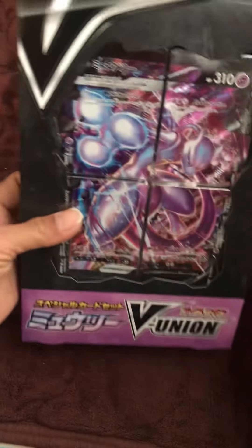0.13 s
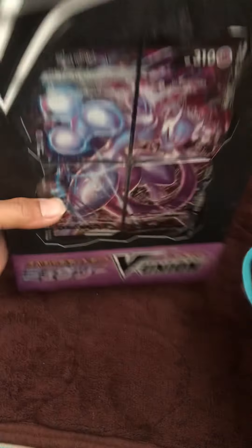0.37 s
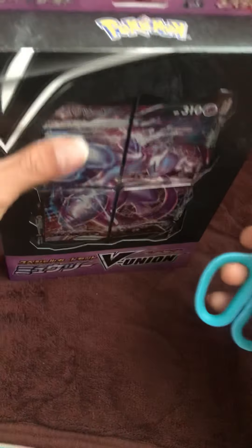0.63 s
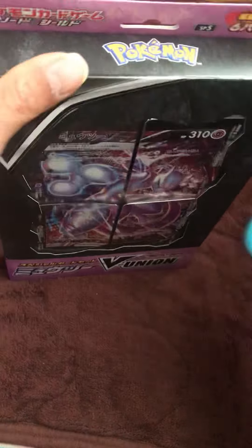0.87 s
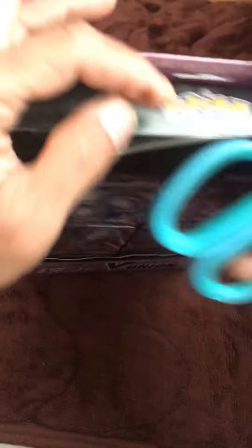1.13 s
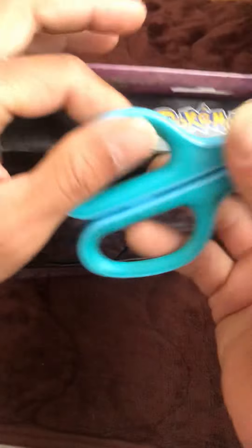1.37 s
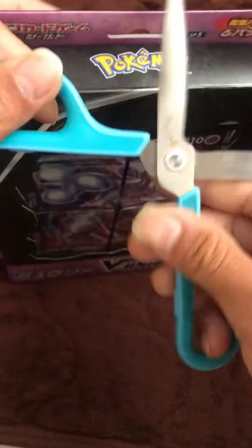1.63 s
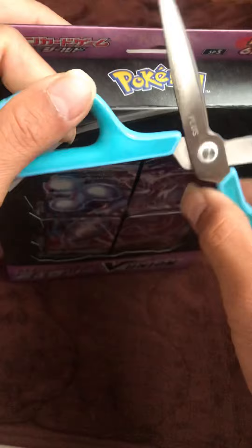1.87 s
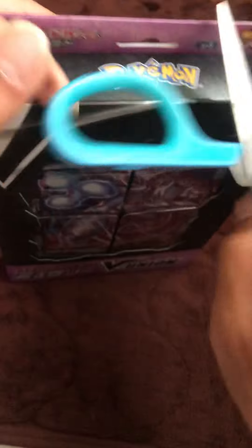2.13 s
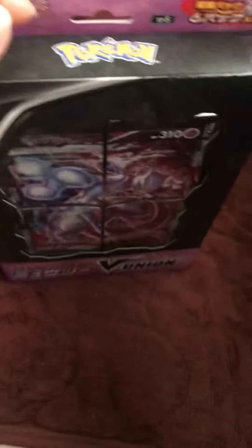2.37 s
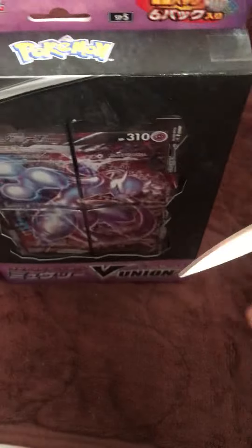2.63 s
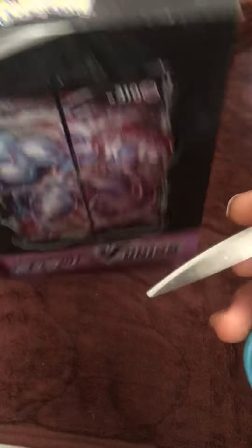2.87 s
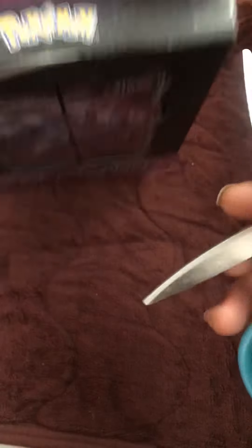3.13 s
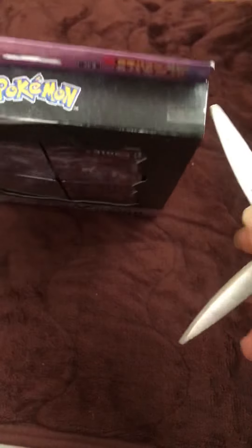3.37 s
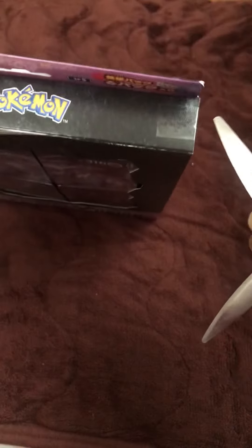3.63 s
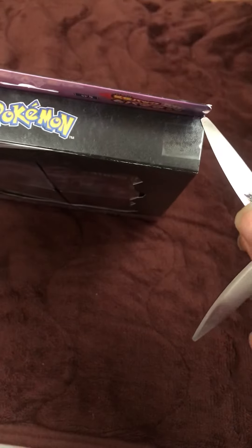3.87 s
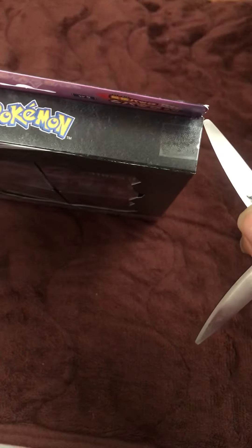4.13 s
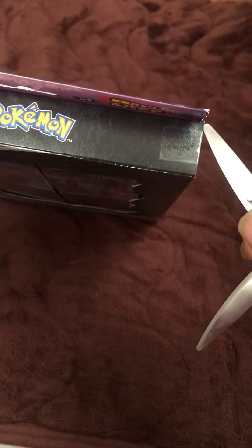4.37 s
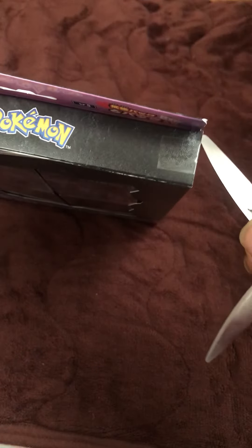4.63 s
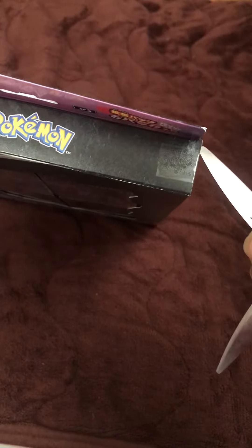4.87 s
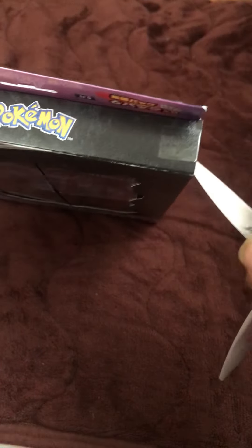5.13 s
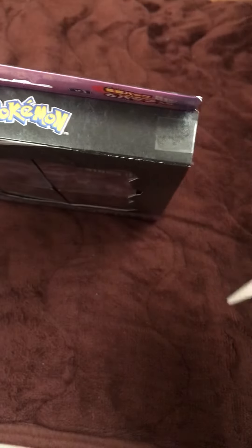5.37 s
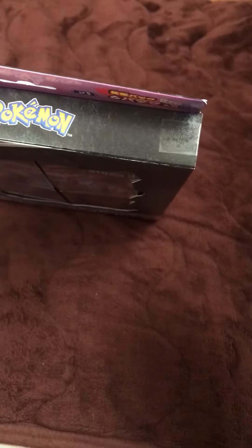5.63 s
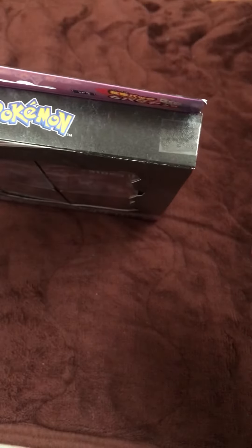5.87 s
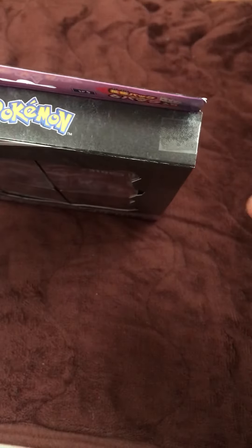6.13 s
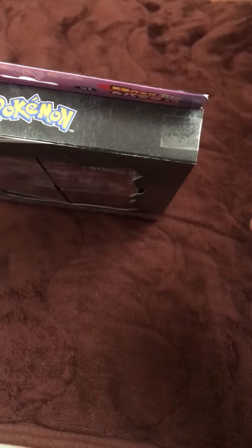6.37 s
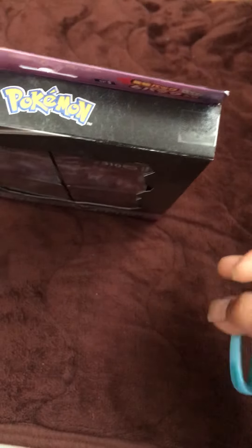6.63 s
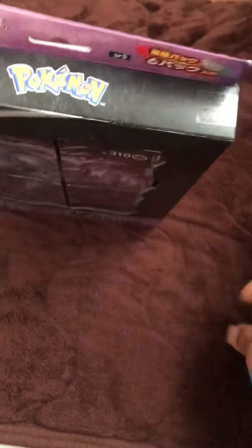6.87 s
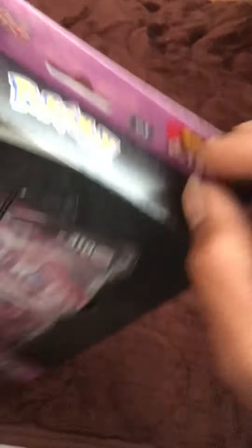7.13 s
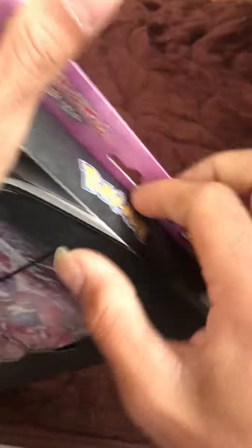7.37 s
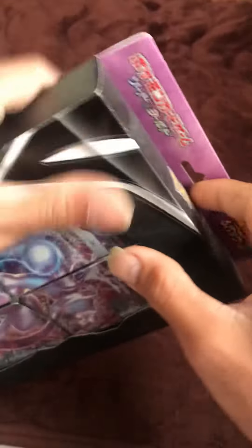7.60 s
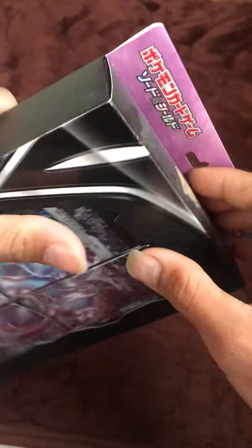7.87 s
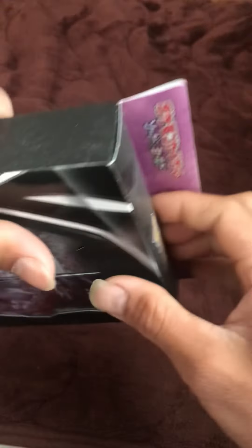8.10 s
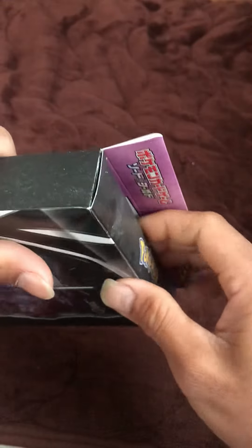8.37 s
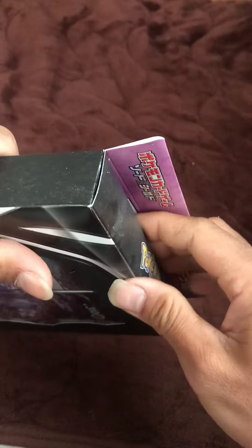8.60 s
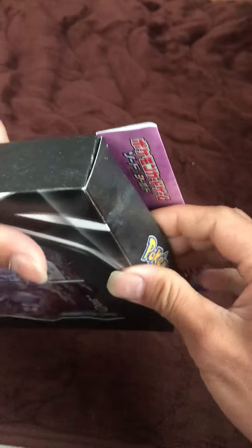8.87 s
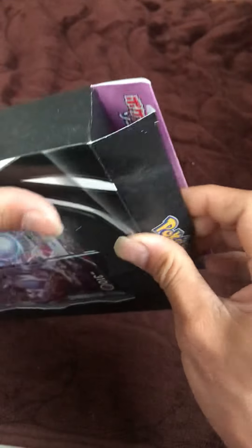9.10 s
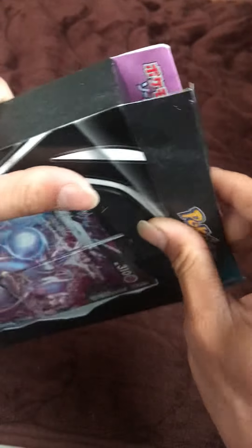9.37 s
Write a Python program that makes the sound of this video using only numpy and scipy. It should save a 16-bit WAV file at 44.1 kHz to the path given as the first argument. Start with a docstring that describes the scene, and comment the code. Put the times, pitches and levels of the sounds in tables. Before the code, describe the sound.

A small, quiet room with low hum and faint hiss, heard close through a hand-held phone. From 0 to 2.4 seconds, fingers rub and tap a thin card box: gritty scuffs, small clicks and low handling rumble, busiest around 1 to 1.4. At about 2.45 a solid, boxy knock lands with a dull thud; lighter scuffs follow, with a softer bump at 3.2. Then it is nearly still, with tiny ticks around 4, until one bright, sharp snap at 5.0. Hum fills the lull to 6.6, where a thin click starts new handling. From 7 to 7.8 come clustered creases, rubs and soft thumps, then quieter creaking. Stiff card cracks at 8.7 and harder at 8.9, crunches at 9.1, and bursts in the loudest snap at 9.3, settling quickly with a short, dry echo.

```python
"""In a small quiet room that hums, close to a hand-held phone's microphone, hands open a thin card box on a soft cloth.
They turn the box, slit its tape with scissors and pry the flap open: stiff card and its plastic window snap.
Rubs and creaks are gritty noise, and snaps are bursts of tiny cracks; both ring the resonances of the box.
Thuds are short low tones that sink in pitch; rumble and room hum are shaped noise, and a short echo follows the box."""
import sys
import numpy as np
from scipy import signal
from scipy.fft import rfft, irfft
from scipy.io import wavfile

SR = 44100
rng = np.random.default_rng(int(sys.argv[2]) if len(sys.argv) > 2 else 0)


def invert_db(level):
    """Linear amplitude ratio for a level in decibels (20 dB per decade), elementwise."""
    return 10 ** (np.asarray(level, dtype=float) / 20)


def bounce(signal):
    """Save signal as a 16-bit WAV file at the path given by the first command-line argument."""
    frames = np.transpose(np.atleast_2d(signal))
    limited = np.clip(frames, -1, 1)
    pcm = np.round(limited * 32767).astype(np.int16)
    wavfile.write(sys.argv[1], SR, pcm)


N = 418509
TIME = np.arange(N) / SR


def unit(x):
    """Scale to rms 1."""
    return x / np.sqrt(np.mean(x ** 2))


def band(x, lo_hz, hi_hz):
    """Keep what lies between two pitches."""
    return signal.sosfilt(signal.butter(2, [lo_hz, hi_hz], "band", fs=SR, output="sos"), x)


def walk(rate):
    """Random levels, rate a second, joined by straight lines."""
    count = int(rate * N / SR) + 2
    return 1.71 * np.interp(TIME * rate, np.arange(count), rng.standard_normal(count))


def grit(size, spread_db):
    """Noise whose samples vary widely in size: many small, a few large."""
    sizes = invert_db(spread_db * rng.exponential(size=size))
    return unit(rng.standard_normal(size) * sizes)


# Hum of the room and the microphone's own hiss.
# Each row: pitch in Hz, relative density in dB per Hz.
AIR_SPECTRUM = [(15, -48.5), (25, -8.5), (102, -2), (141, -5), (157, -18.5), (255, -18.5), (284, -29),
                (343, -17.5), (475, -21), (515, -15.5), (675, -22.5), (793, -20), (1990, -33.5),
                (4470, -36.5), (15900, -42.5)]


def air():
    """Steady noise with the spectrum of room hum and microphone hiss."""
    level_db = -60  # rms
    hz, db = np.transpose(AIR_SPECTRUM)
    f = np.maximum(np.fft.rfftfreq(N, 1 / SR), 1)
    shape = invert_db(np.interp(np.log(f), np.log(hz), db))
    hum = irfft(rfft(rng.standard_normal(N)) * shape, N)
    return invert_db(level_db) * unit(hum)


# Low rumble through the floor and the hand-held phone.
# Each row: time in seconds, deep level in relative dB, upper level in relative dB.
RUMBLE_LEVELS = [(0.0, -50, -63.5), (3.7, -68, -70.5), (3.96, -56.5, -68.5), (6.449, -62.5, -72),
                 (7.72, -53, -58), (8.06, -62.5, -71.5), (8.62, -59, -55), (9.09, -60, -68),
                 (9.49, -67, -69)]


def rumble():
    """Two low bands of noise that swell with the handling and waver."""
    waver_db = 2.3
    s, deep_db, upper_db = np.transpose(RUMBLE_LEVELS)
    deep_level = np.interp(TIME, s, deep_db - 0.5) + waver_db * walk(9)
    deep = unit(band(rng.standard_normal(N), 45, 77)) * invert_db(deep_level)
    upper_level = np.interp(TIME, s, upper_db + 2.5) + waver_db * walk(14)
    upper = unit(band(rng.standard_normal(N), 110, 260)) * invert_db(upper_level)
    return deep + upper


# Which box modes lead around each sound; each row holds until the next.
# Each row: start in seconds, low leading pitch in Hz, upper leading pitch in Hz.
LEADING_MODES = [(0.43, 1490, 1670), (0.66, 930, 1740), (1.0, 950, 2940), (2.456, 1020, 4000),
                 (2.7, 940, 3030), (3.22, 940, 1480), (3.9, 850, 2580), (4.92, 880, 2560),
                 (4.984, 3300, 5400), (5.2, 800, 3000), (6.6, 1400, 6700), (6.766, 921, 2640),
                 (7.058, 640, 3300), (7.312, 910, 2620), (7.43, 940, 3800), (7.6, 1000, 1600),
                 (7.78, 930, 2500), (8.45, 1000, 1420), (8.707, 650, 2230), (8.792, 910, 4030),
                 (8.91, 940, 2510), (9.314, 840, 3330)]


def lead_db(hz, lift_db):
    """Lift over time for a mode near one of the two leading pitches."""
    s, *lead = np.transpose(LEADING_MODES)
    octaves = np.log2(hz / np.array(lead))
    near = np.max(np.exp(-(octaves / .25) ** 2), axis=0)
    # a row applies from 5 ms ahead of its start; the first also covers the opening
    row = np.maximum(np.searchsorted(s - .005, TIME) - 1, 0)
    return lift_db * near[row]


# What card panels, cavity and plastic window ring with.
# Each row: pitch in Hz, width in Hz, relative level in dB.
BOX_MODES = [(313, 330, -5.5), (650, 160, -0.5), (940, 140, 0.5), (1200, 300, -7.5), (1408, 110, -6),
             (1647, 630, -4), (2360, 410, 1), (2742, 510, 1), (3300, 590, -0.5), (3997, 610, -3.5),
             (4560, 660, -6), (5000, 330, -4.5), (5300, 1100, 4.5), (6840, 2200, -1.5), (7850, 1000, -12),
             (9080, 1500, -4.5), (11700, 3000, -8.5), (13800, 3000, -14.5)]
# Borders of the four groups of box modes, dull to sharp: each entry a pitch in Hz.
GROUP_BORDERS_HZ = [0, 1500, 4500, 7500, 22050]


def ring(pushes, colour_db):
    """Each push, dull to sharp, rings its own group of box modes; colour_db(hz) weighs a mode over time."""
    out = 0
    for push, lo, hi in zip(pushes, GROUP_BORDERS_HZ, GROUP_BORDERS_HZ[1:]):
        modes = [m for m in BOX_MODES if lo <= m[0] < hi]
        # before colouring, white noise of rms 1 leaves the group near rms 1
        power = sum(invert_db(db) ** 2 * np.pi * width / SR for _, width, db in modes)
        for k, (hz, width, db) in enumerate(modes):
            sign = (-1) ** k
            gain = sign * invert_db(db + colour_db(hz)) / np.sqrt(power)
            out = out + signal.lfilter(*signal.iirpeak(hz, hz / width, SR), gain * push)
    return out


# Snaps, taps and creases close to the microphone.
# Each row: start in seconds, middle ring in relative dB, low ring in relative dB,
# treble ring in relative dB, nominal release in ms.
SNAP_EVENTS = [(0.0354, -56, -57, -77, 6.2), (0.411, -43, -66, -61, 11), (0.4758, -55, -53, -57, 2.8),
               (0.592, -57.5, -66, -54, 6.7), (0.6566, -46, -41.5, -54, 5.2), (0.7494, -54, -49, -64, 2.7),
               (0.8647, -53, -53.5, -75, 5.9), (0.9967, -37, -55, -46, 5.8), (1.0719, -35, -40.5, -54, 4.4),
               (1.211, -53, -45.5, -69, 3.6), (1.342, -39, -38, -64, 2.3), (1.3888, -56, -34.5, -58, 7.9),
               (1.697, -50, -59, -72, 1.6), (2.1515, -59, -48, -70, 5.1), (2.1718, -56, -46.5, -70, 6.2),
               (2.4474, -44, -39, -55, 5.2), (2.4565, -24.5, -21, -31, 2.9), (2.474, -30, -34, -44, 6.3),
               (2.5282, -61, -71, -48, 4.7), (2.714, -44, -61, -45.5, 2.5), (2.8172, -42, -46.5, -68, 5.4),
               (3.101, -53.5, -78, -71, 2.6), (3.2231, -37, -35.5, -52, 2.4), (3.9453, -57, -55, -74, 8.6),
               (4.0205, -57, -51, -74, 2.5), (4.06, -51, -53, -65, 6.9), (4.1643, -46, -60, -72, 1.4),
               (4.6159, -56, -59, -61, 3.9), (4.9336, -43, -37, -52, 6.8), (4.9846, -15.5, -34.5, -17, 3.1),
               (4.999, -44, -36, -51, 7.7), (5.2168, -56, -55, -66, 2.3), (5.2588, -66.5, -56.5, -69, 5),
               (6.61, -35, -50, -26.5, 1.3), (6.6803, -55, -59, -70, 2.3), (6.7667, -39, -45, -54, 5.2),
               (6.992, -49, -64.5, -65, 2.9), (7.0586, -34.5, -40, -42, 2.8), (7.0878, -37, -37, -43, 5.3),
               (7.11, -38, -28, -52, 7.1), (7.1333, -42, -39, -52, 3.3), (7.1664, -47, -51, -65, 3.3),
               (7.3113, -30.5, -26.5, -40, 5.5), (7.337, -45, -46, -68, 3.9), (7.3502, -40, -42, -54, 1.8),
               (7.4439, -36.5, -51, -47, 1.1), (7.4705, -44, -61, -58, 5.2), (7.5563, -55, -47, -66, 3.7),
               (7.6033, -41.5, -40, -43, 7.7), (7.7064, -47, -47, -47, 1.7), (7.737, -44, -47, -60, 4.7),
               (7.778, -43, -34.5, -56, 3.7), (7.798, -49, -37, -68, 4.4), (7.8174, -59, -57, -55, 3.1),
               (7.8368, -58, -42, -72, 2.6), (8.168, -51.5, -54, -57, 6), (8.1945, -49, -40, -70, 4.6),
               (8.2597, -47, -43, -63, 2), (8.282, -56.5, -59, -54, 5.8), (8.4711, -55.5, -42, -62.5, 3.6),
               (8.6038, -47, -64, -56.5, 2.4), (8.707, -26, -24.5, -36.5, 2.8), (8.734, -42, -41, -54, 4.5),
               (8.7927, -26.5, -39, -31, 1.5), (8.828, -50, -49, -65, 2.8),
               (8.9096, -18.5, -18.5, -18, 3.4), (9.038, -51, -49, -63, 6.7), (9.0524, -52, -44, -61, 5.2),
               (9.079, -21.5, -24.5, -23.5, 6.1), (9.0988, -22, -52, -29.5, 1.9),
               (9.148, -45, -64, -55, 2.2), (9.2673, -53.5, -53, -66, 4), (9.3133, -9, -18, -15, 3.4),
               (9.4563, -50, -52.5, -63, 8.6)]


def snap_db():
    """Strength of each snap in the four mode groups, dull to sharp; the top crack is weaker than the treble."""
    _, mid_db, low_db, treble_db, _ = np.transpose(SNAP_EVENTS)
    return np.array([low_db, mid_db, treble_db, treble_db - 4.5])


# The four mode groups in gritty noise, dull to sharp: each entry a relative level in dB.
GRIT_GROUP_DB = [-2.5, 0.5, -9.5, -15]
# How dullness tips the four groups: each entry dB of level per dB of dullness.
DULL_TILT = [0.77, -0.15, -.9, -1.4]


def grit_power(db, dull_db):
    """Power of gritty noise in the four mode groups; dullness tips it toward the low modes."""
    group_db = db + np.array(GRIT_GROUP_DB) + dull_db * np.array(DULL_TILT)
    return invert_db(group_db)[:, None] ** 2


# Gritty swells: rubs, creaks, lead-ups before snaps and tails after them.
# Each row: peak in seconds, strength in relative dB, nominal rise over 20 dB in ms,
# nominal fall over 20 dB in ms, dullness in dB.
SWELL_EVENTS = [(0.04, -65, 84, 120, 9), (0.351, -63, 280, 100, 4), (0.448, -45, 95, 77, -2),
                (0.542, -46.5, 77, 21, -0.5), (0.604, -44, 16, 13, -2), (0.664, -44.5, 14, 114, 0),
                (0.994, -47.5, 3, 198, -7), (1.042, -46, 53, 32, -2), (1.157, -47.5, 250, 50, 7),
                (1.235, -56.5, 200, 73, 2.5), (1.349, -50.5, 16, 294, 9), (1.397, -45, 78, 120, 1),
                (1.523, -50.5, 43, 102, 1.5), (1.854, -67.5, 300, 300, 4), (2.11, -62, 30, 200, -2),
                (2.167, -55, 100, 45, 0), (2.347, -58.5, 116, 125, -3), (2.428, -55, 50, 40, -6),
                (2.463, -31, 22, 38, 1.5), (2.723, -50.5, 108, 70, 1), (2.82, -58.5, 114, 109, 4.5),
                (3.0, -59, 35, 143, -2), (3.043, -60, 90, 110, 6), (3.218, -46, 36, 49, 1),
                (3.3, -57, 50, 300, 3), (3.408, -60, 250, 86, -1), (4.775, -68.5, 350, 140, 9),
                (4.93, -45, 9, 110, 6), (4.974, -44.5, 60, 30, 4), (4.998, -39, 21, 95, 0),
                (5.218, -53.5, 40, 24, 5), (6.314, -72.5, 404, 447.5, -4.5), (6.61, -58.5, 97.5, 76, -3.5),
                (6.749, -60.5, 176.5, 200, 4), (7.004, -55.5, 152, 141, 0.5), (7.064, -48, 15, 120, 4),
                (7.11, -47, 70, 110, -4), (7.18, -63, 195, 210, -9), (7.297, -58, 400, 53, -9.5),
                (7.32, -46.5, 10.5, 56, 1), (7.449, -48, 128, 166, 4.5), (7.607, -45.5, 250, 293, 0),
                (7.715, -52.5, 37, 396, 9.5), (7.944, -61, 501.5, 133.5, -4), (8.185, -45.5, 50, 41, 3),
                (8.281, -56.5, 128.5, 185, 2), (8.477, -60, 112, 345.5, 7), (8.54, -64.5, 200, 400, 14),
                (8.64, -69, 198, 150, 14), (8.809, -52, 28.5, 173, 14.5), (9.066, -49, 90, 38.5, 3),
                (9.091, -33.5, 39, 64.5, 5.5), (9.302, -47, 93.5, 24, 5.5), (9.32, -31.5, 6, 62, 1),
                (9.46, -59, 100, 60, 2)]
# The treble of each gritty swell fades first: each entry a group's share of the fall time.
FADE_TIMES = [1.0, 1.0, .95, .7]


def swells():
    """Power of each gritty swell rises to a peak and fades, in every mode group."""
    power = np.zeros((4, N))
    for s, db, rise_ms, fall_ms, dull_db in SWELL_EVENTS:
        start = max(int((s - rise_ms / 400) * SR), 0)
        stop = int((s + fall_ms / 400) * SR)
        ms = (TIME[start:stop] - s) * 1000
        fall = ms / (max(fall_ms, 5) * np.array(FADE_TIMES)[:, None])
        rise = -ms / max(rise_ms, 5)
        power[:, start:stop] += grit_power(db, dull_db) * 100. ** -np.maximum(fall, rise)
    return power


def crunch():
    """A snapped crease keeps crunching as it settles: its power decays after each snap."""
    level_db, treble_db, t60_s = -23.5, -6.5, .18
    group_db = level_db + treble_db * np.array([[0], [0], [1], [2]])
    starts = np.zeros((4, N))
    starts[:, (np.array(SNAP_EVENTS)[:, 0] * SR).astype(int)] = invert_db(snap_db() + group_db) ** 2
    keep = 1e-6 ** (1 / (t60_s * SR))
    return signal.lfilter([1], [1, -keep], starts)


def rub():
    """Gritty, flickering noise with ticks, as of skin that sticks and slips on glossy card.

    Which modes lead changes from sound to sound and wanders."""
    resting = grit_power(-76.5, 7.5)  # hands resting on the box
    power = resting + swells() + crunch()
    flicker_db = 2.2 * walk(90)
    ticks = (rng.random(N) < 220. / SR) * rng.standard_normal(N) * invert_db(18.0)  # about 220 a second
    slip = unit(grit(N, 1.9) + ticks)
    push = slip * invert_db(flicker_db) * np.sqrt(power)
    return ring(push, lambda hz: lead_db(hz, 1.7) - 0.5 + 1.8 * walk(25))


def snaps():
    """Stored strain lets go in a few ms of tiny cracks; the low modes are fed longer than the high."""
    size = 2048
    span_s = .006  # sets the energy of a burst: that of rms 1 over this time
    push = np.zeros((4, N + size))
    t = np.arange(size) / SR
    cracks = grit(len(SNAP_EVENTS) * size, 1.9).reshape(len(SNAP_EVENTS), size)
    for (s, *_, ms), ring_db, crack in zip(SNAP_EVENTS, snap_db().T, cracks):
        release = ms / 1000 * np.array([[1.1], [.8], [.65], [.45]])
        burst = (1 - np.exp(-t / 0.00018)) * np.exp(-t / release) * crack
        # the strain sets the energy, however the cracks share it
        burst = burst * np.sqrt(span_s * SR) / np.linalg.norm(burst, axis=1, keepdims=True)
        i = int(s * SR)
        push[:, i:i + size] += invert_db(ring_db)[:, None] * burst
    # which modes lead changes from sound to sound and wanders
    return ring(push[:, :N], lambda hz: lead_db(hz, 4.6) - 2.5 + 1.2 * walk(17))


# Short echo of the room.
# Each row: pitch near the top of its band in Hz, time to decay by 60 dB in seconds.
ROOM_DECAY = [(300, 0.28), (1000, 0.15), (3000, 0.12), (6000, 0.068), (12000, 0.064)]


def room(x):
    """Dense short echo of table, cloth and walls; the treble dies first."""
    level_db = -21
    t = np.arange(SR // 3) / SR
    tail = np.zeros(len(t))
    for hz, t60 in ROOM_DECAY:
        noise = band(rng.standard_normal(len(t)), hz / 2.6, min(hz * 1.11, 18000))
        tail += noise * np.exp(-np.log(1000) * t / t60)
    tail = tail * (1 - np.exp(-t / .006))
    return invert_db(level_db) * signal.fftconvolve(x, tail / np.sqrt(np.sum(tail ** 2)))[:N]


# Soft blows that shake the whole box.
# Each row: start in seconds, strength in relative dB, starting pitch in Hz, time to decay by 60 dB in seconds.
THUD_EVENTS = [(2.457, -25, 139, 0.15), (2.714, -42, 65, 0.18), (3.222, -32.5, 87.8, 0.13),
               (4.986, -27.5, 72, 0.16), (4.994, -29.5, 150, 0.098), (6.953, -32.5, 79, 0.15),
               (7.062, -38, 110.4, 0.096), (7.11, -33.5, 212, 0.065), (7.312, -43, 68, .15),
               (7.47, -34.5, 139, 0.081), (7.775, -28, 152, 0.049), (8.911, -25, 125, 0.06),
               (9.085, -35, 118, 0.29), (9.09, -32, 58.6, 0.2), (9.314, -34.5, 129, 0.16)]


def thuds():
    """A soft push sets the whole box and the cloth under it bouncing for a few cycles, sinking in pitch."""
    out = np.zeros(N)
    for s, strength_db, hz, t60 in THUD_EVENTS:
        t = np.maximum(TIME - s, 0)
        shape = (1 - np.exp(-t / 0.002)) * np.exp(-np.log(1000) * t / t60)
        cycles = hz * t * (1 - 1.5 * np.minimum(t, .2))
        out += invert_db(strength_db + 1.5) * shape * np.sin(2 * np.pi * cycles)
    return out


def scene():
    """Box sounds with their echo over the room noise."""
    near = rub() + snaps()
    return (air() + rumble() + near + room(near) + thuds())[None]


def top_cut(x):
    """Nothing passes above the cut-off."""
    return signal.sosfilt(signal.butter(12, 16930, fs=SR, output="sos"), x)


# Dips of the phone's microphone port.
# Each row: pitch in Hz, width in Hz.
PORT_DIPS = [(10500, 760)]


def record(dry):
    """The phone's microphone cuts the deep bass, its port dips the treble, and peaks are rounded."""
    low_cut_hz, dip_share, ceiling = 37.5, 0.12, .97
    x = signal.sosfilt(signal.butter(2, low_cut_hz, "high", fs=SR, output="sos"), dry)
    for hz, width in PORT_DIPS:
        x = x - dip_share * signal.lfilter(*signal.iirpeak(hz, hz / width, SR), x)
    # the loudest crack meets the ceiling softly
    x = x / (1 + np.abs(x / ceiling) ** 6) ** (1 / 6)
    return top_cut(x)


dry = scene()
out = record(dry)
bounce(out)
```